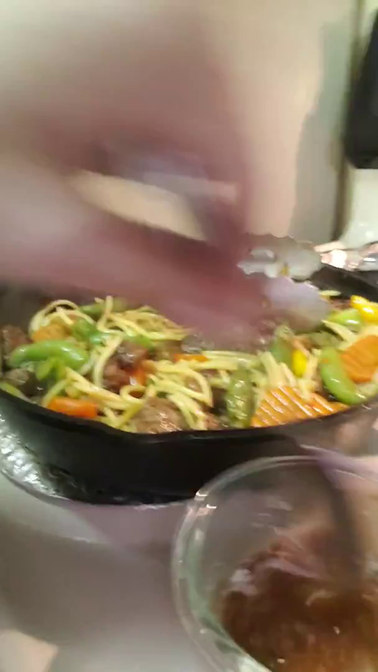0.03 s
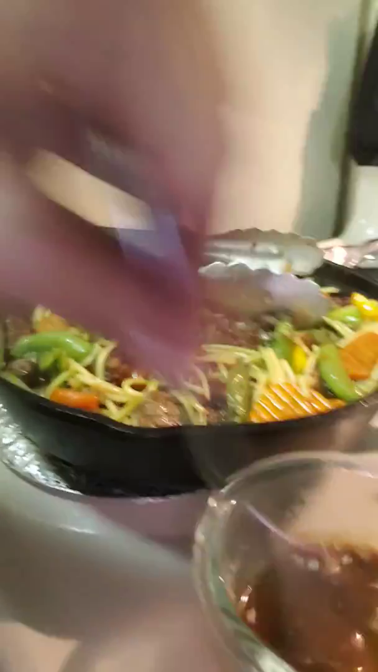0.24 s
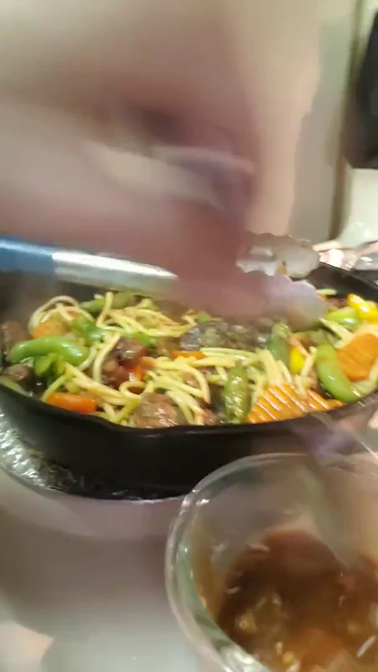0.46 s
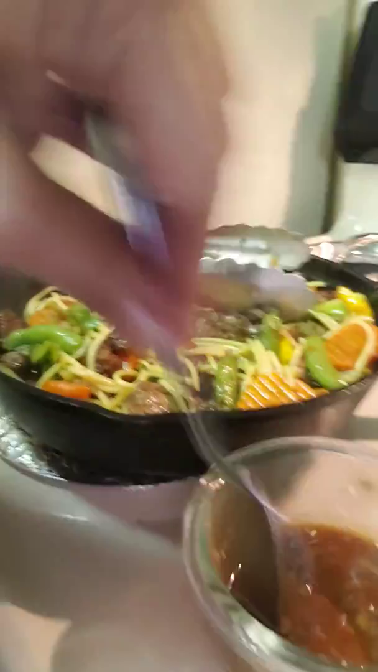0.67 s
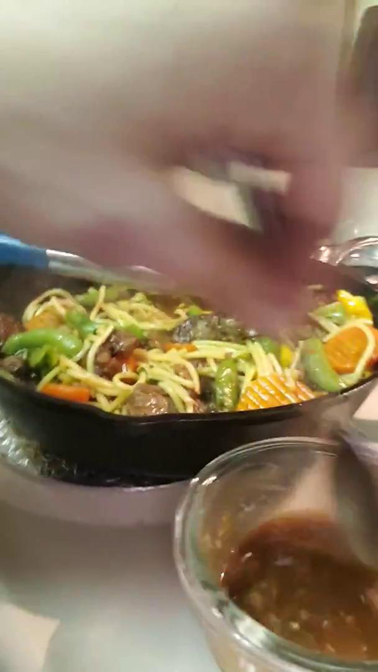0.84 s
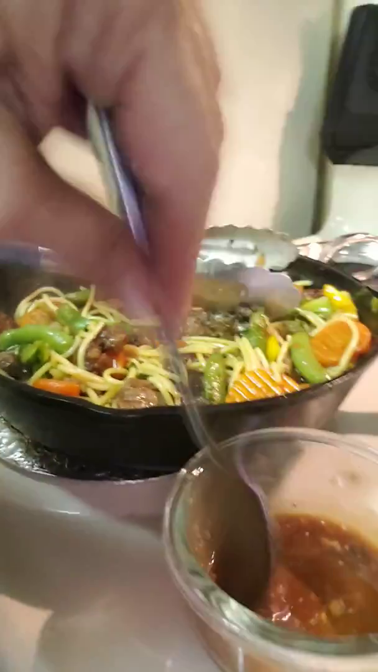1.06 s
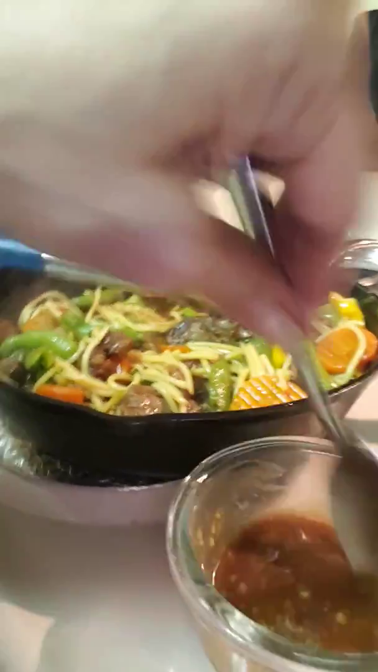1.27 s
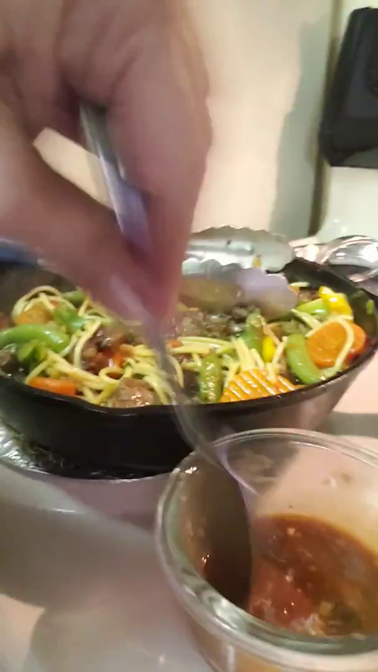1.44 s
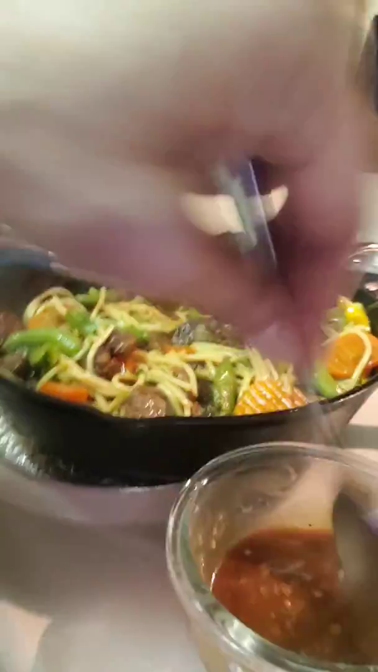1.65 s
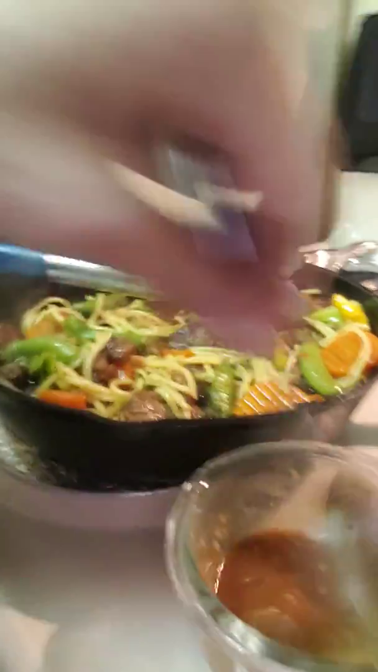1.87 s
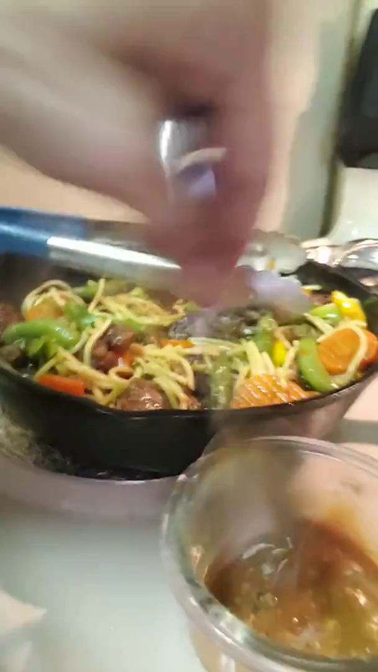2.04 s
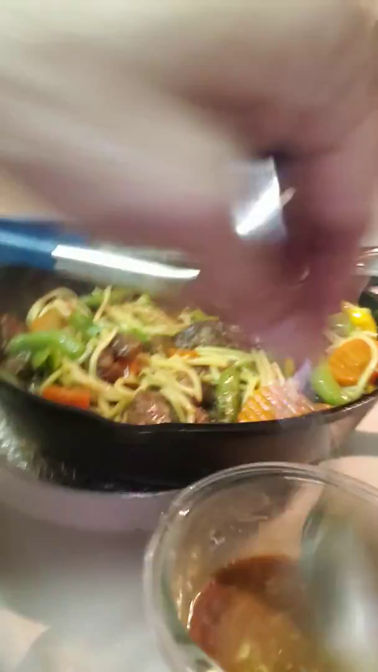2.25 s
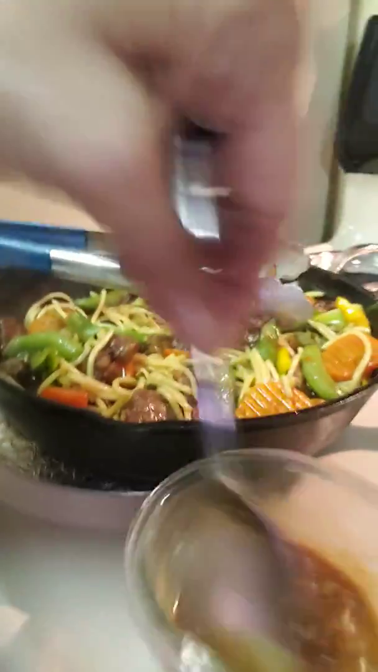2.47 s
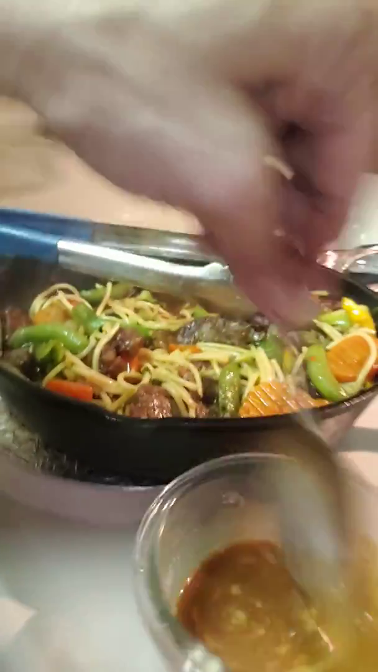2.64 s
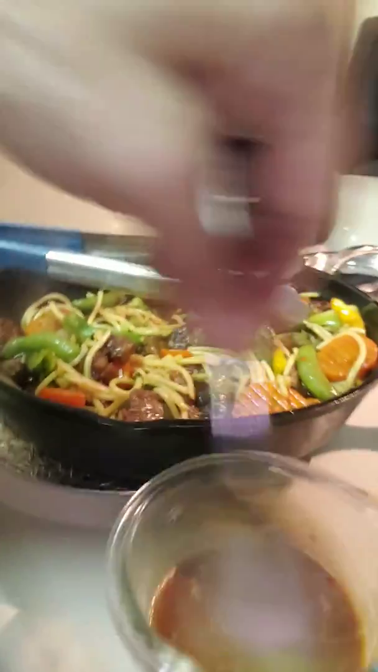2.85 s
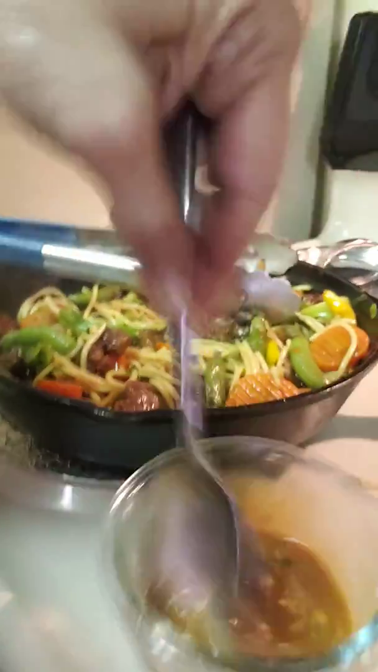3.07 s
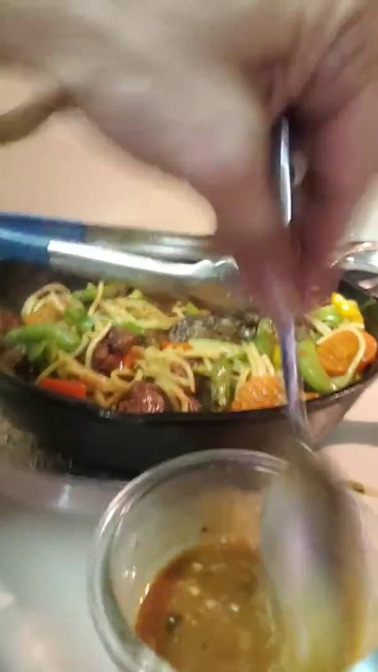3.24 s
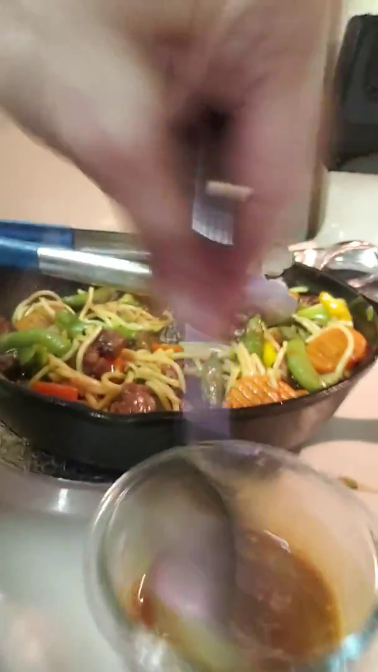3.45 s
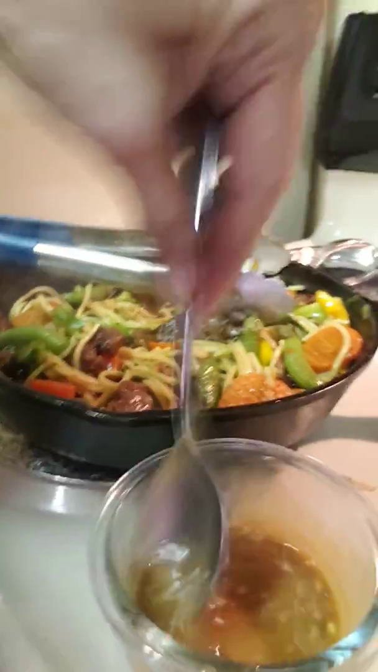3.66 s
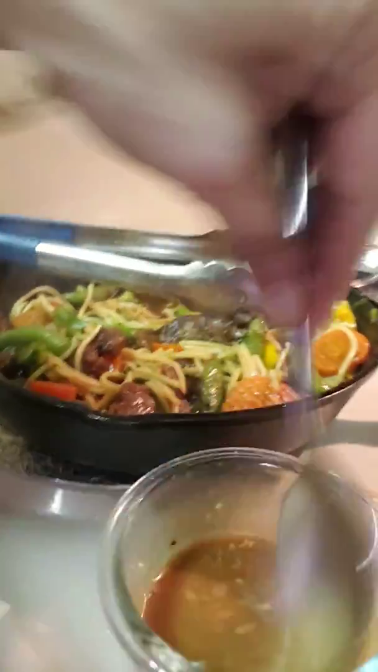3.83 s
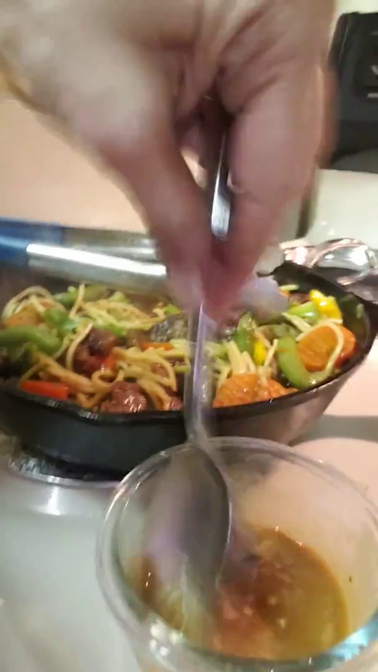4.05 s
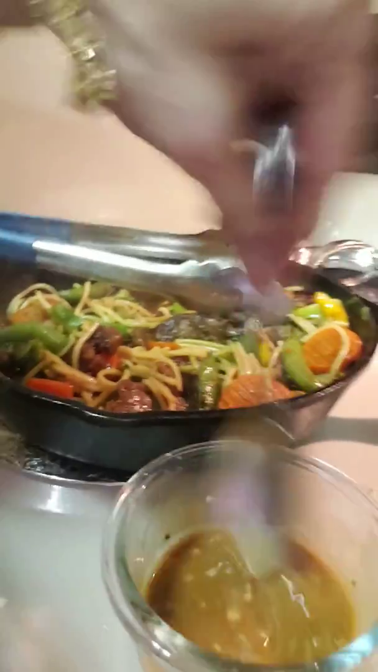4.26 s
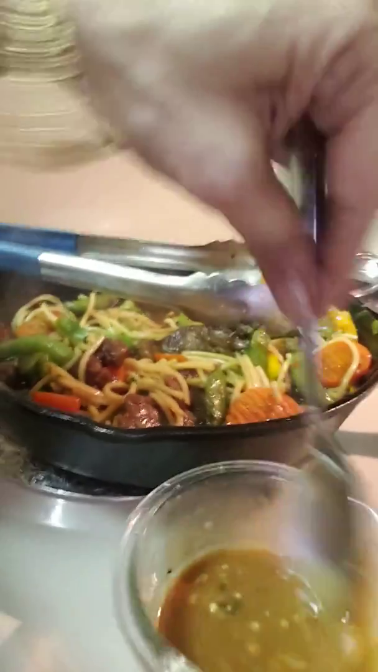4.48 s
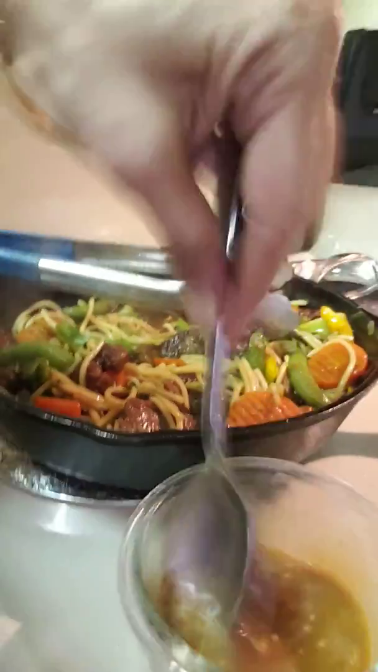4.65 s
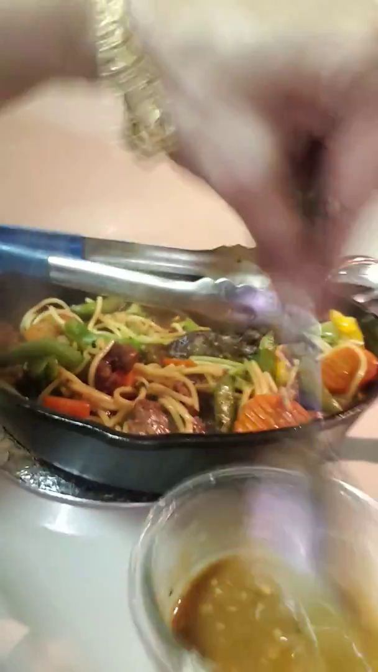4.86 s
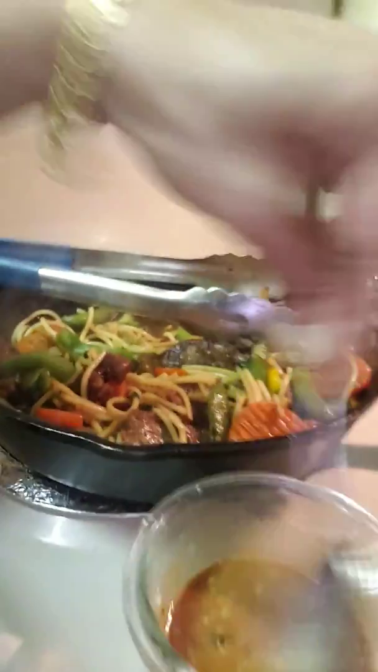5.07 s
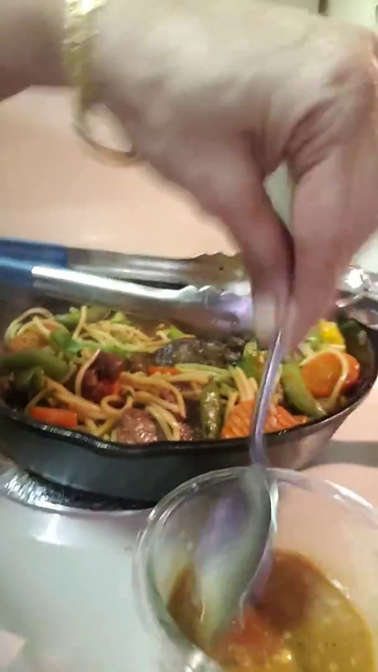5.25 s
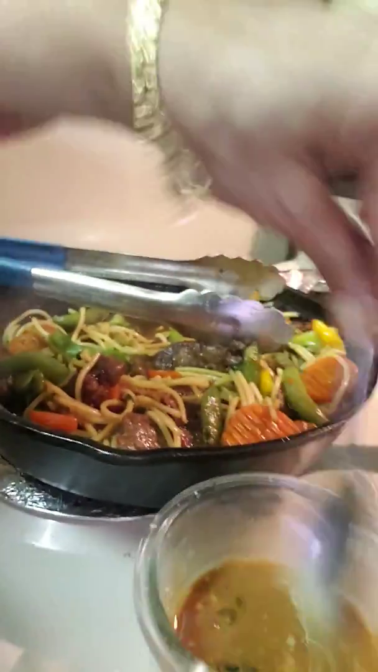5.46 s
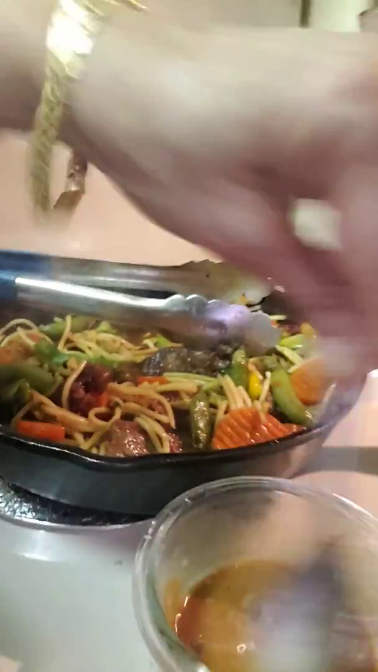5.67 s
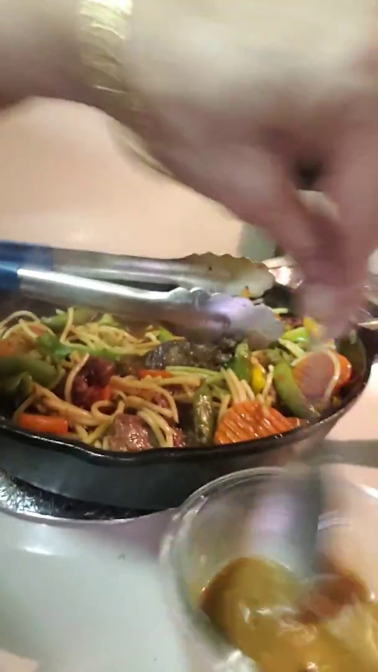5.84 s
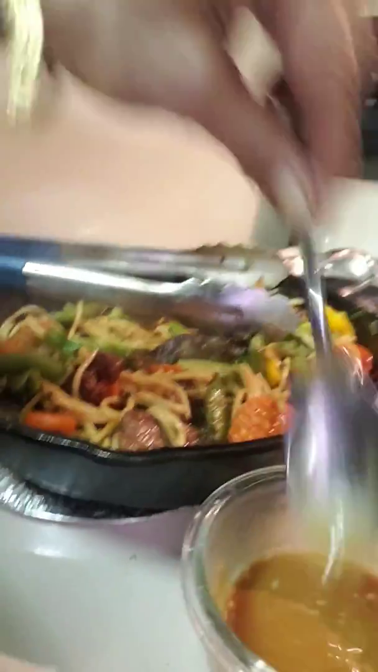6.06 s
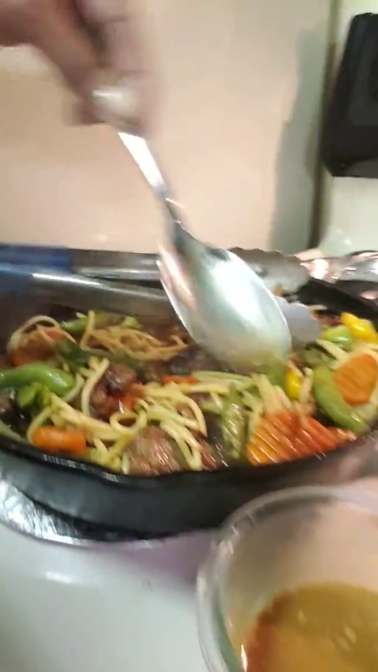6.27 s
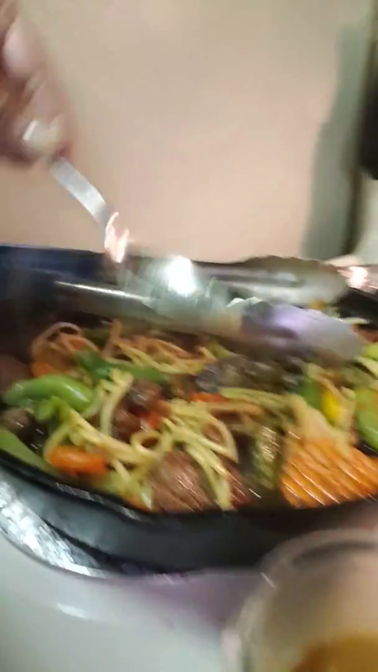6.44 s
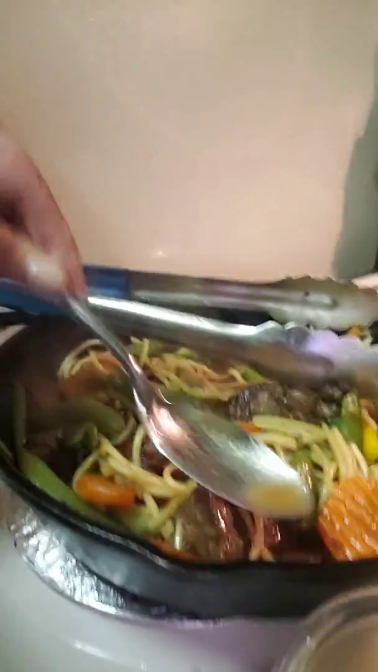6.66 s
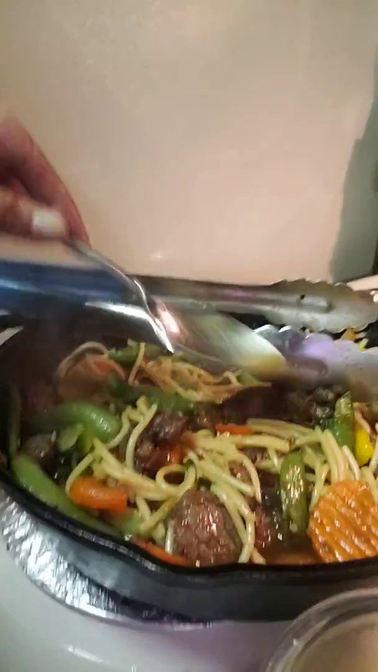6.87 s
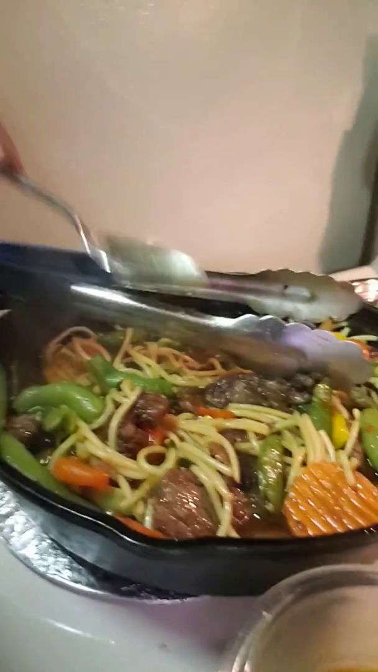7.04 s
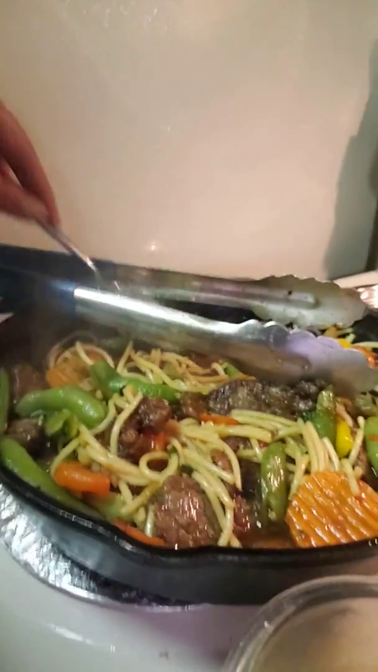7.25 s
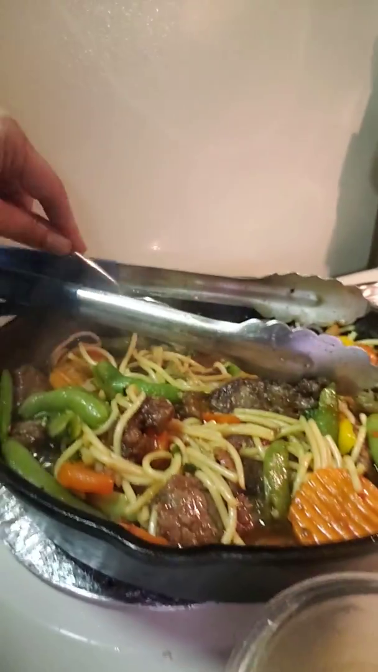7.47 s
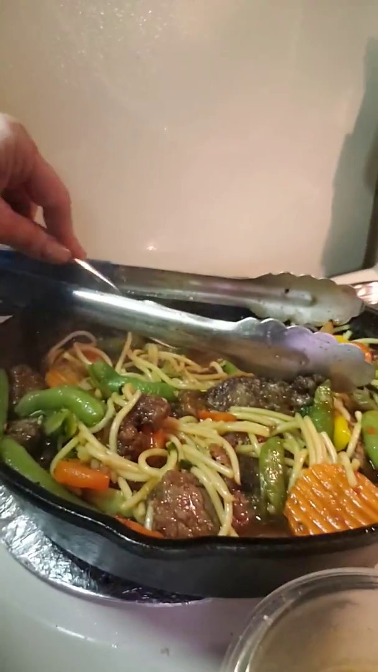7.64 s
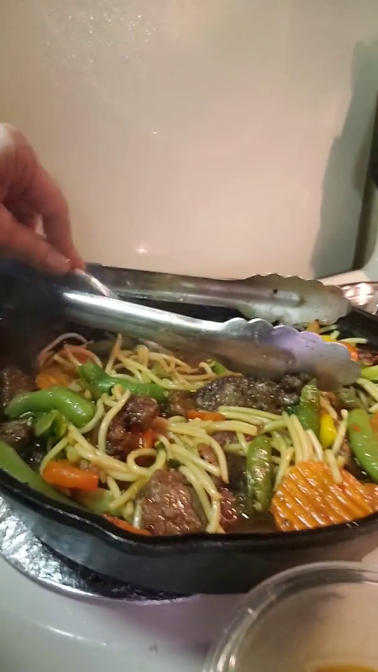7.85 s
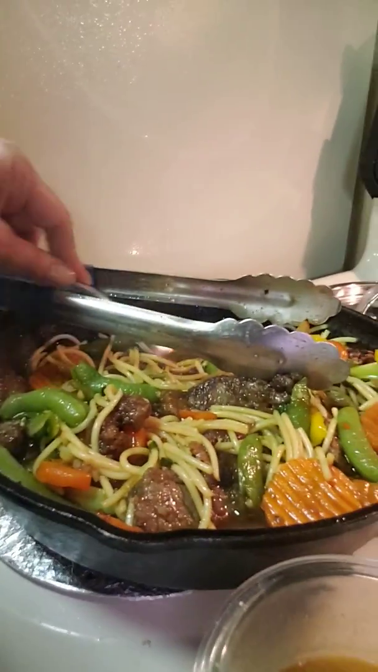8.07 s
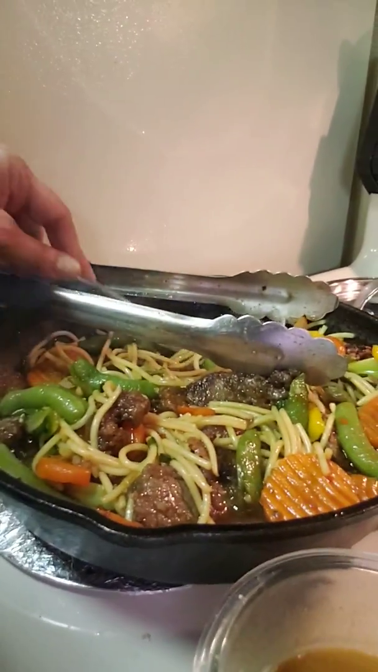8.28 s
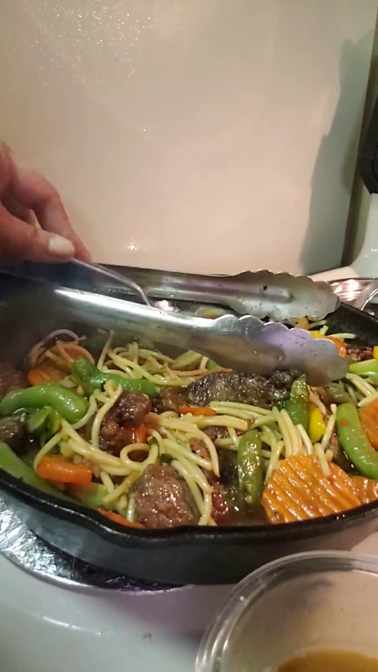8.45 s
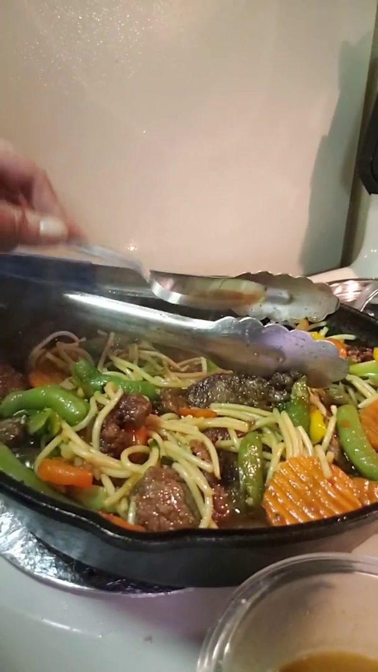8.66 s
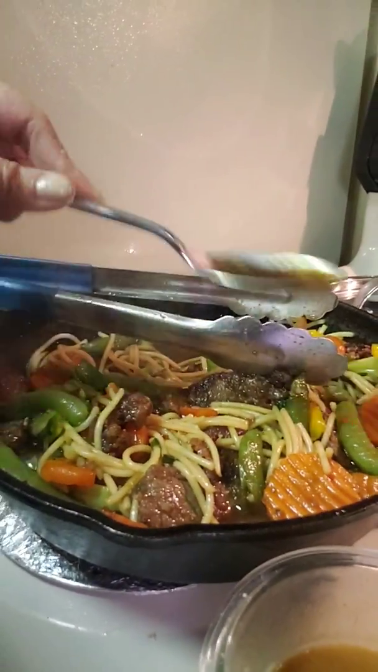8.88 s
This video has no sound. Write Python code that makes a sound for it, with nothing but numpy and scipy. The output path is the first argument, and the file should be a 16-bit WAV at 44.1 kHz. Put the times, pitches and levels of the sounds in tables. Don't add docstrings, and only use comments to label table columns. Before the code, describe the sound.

From the start to about 5.9 seconds, a metal spoon stirs sauce quickly in a small glass bowl very near the phone. Hard, bright clinks land unevenly, roughly two to five contacts a second, each a crisp crack with a short, choked high ring. Between them come lighter ticks, gritty steel-on-glass scrapes and dull bottom knocks; from about 2 seconds the knocks grow firmer, thumping the counter. Small wet splashes appear near 0.6, 2.7 and 4.5 seconds. Stirring ends near 5.9, leaving soft, fine sizzle and low kitchen motor hum. Faint spits begin around 6.4; one loud sharp pop comes at 6.9 with a brief rub, and another weaker pop at 7.3 with a short spoon slide and faint metallic notes. From 7.9 to 8.9 small crackles gather as sizzle and hum swell slightly. Short room echo throughout.

```python
import sys
import numpy as np
from scipy import signal
from scipy.fft import rfft, irfft
from scipy.io import wavfile
from scipy.ndimage import uniform_filter1d

SR = 44100
rng = np.random.default_rng(int(sys.argv[2]) if len(sys.argv) > 2 else 0)


def bounce(signal):
    frames = np.transpose(np.atleast_2d(signal))
    limited = np.clip(frames, -1, 1)
    pcm = np.round(limited * 32767).astype(np.int16)
    wavfile.write(sys.argv[1], SR, pcm)


def voltage_ratio(level):
    return 10 ** (np.asarray(level, float) / 20)


N = 392928

# (time [s], crack [dB], ring [dB], tilt to high mode [dB], free ring [ms])
BLOWS = [(0.318, -11.5, -13.5, -0.5, 14), (0.6334, -18, -22, -5, 14), (0.716, -16.5, -16.5, -9.5, 4.5),
         (1.1123, -11, -5.5, -2, 7.1), (1.4596, -17, -13.5, -6.5, 5.3), (1.711, -23.5, -24.5, 2, 5.5),
         (2.0202, -9, -11, -6.5, 4.4), (2.138, -18, -17, -4.5, 2.3), (2.366, -7, -16.5, -6, 15.6),
         (2.6609, -18, -21.5, -8, 2), (2.9763, -17, -20, -4, 3.2), (3.1101, -18, -18.5, -1, 4.4),
         (3.286, -12, -14, 2.5, 9.3), (3.6076, -10.5, -10.5, 3, 3.5), (3.6435, -18, -22.5, 0, 9.8),
         (3.665, -12.5, -21, -4.5, 14), (3.9218, -12, -11, 2.5, 6.8), (3.9305, -25.5, -17.5, -0.5, 3),
         (4.2746, -13, -13.5, 1, 6.1), (4.8752, -12.5, -11.5, 5, 14), (4.9752, -12.5, -16.5, 1.2, 7.8),
         (5.163, -10.5, -18, 4.5, 7.1), (5.5127, -12.5, -9, 4.5, 7.8), (5.8023, -13, -7.5, 2.5, 5.3)]
# (time [s], crack [dB],
# ring [dB], tilt to high mode [dB])
TOUCHES = [(-.012, -21, -16, -1.5), (.002, -34.5, -29, 5), (0.046, -36, -32, -1), (.35, -21, -25, 0),
           (2.3705, -11, -15.5, 6.5), (3.657, -20, -21.5, -1), (5.7995, -27.5, -22, 0),
           (4.58, -49, -50.5, -10), (0.0282, -36, -28, 2.5), (0.2101, -25, -32.5, -6.5),
           (0.5102, -28, -48.5, 6), (0.9687, -26, -29, -1.5), (1.1794, -33, -33.5, 5.5),
           (1.2062, -29.5, -38.5, -21.5), (1.3526, -29, -29.5, 2), (1.5665, -26, -32.5, -10.5),
           (1.9692, -34, -39, 5.5), (2.2632, -29, -32, -9.5), (2.4747, -27.5, -34, -16.5),
           (2.589, -23.5, -33, 13.5), (2.738, -31.5, -38, -17), (2.8219, -36, -39.5, -18),
           (2.9207, -28.5, -36, -16.5), (3.0368, -28, -32.5, -17), (3.3544, -21.5, -23.5, 4),
           (3.6183, -18.5, -14, 1.5), (3.973, -19.5, -22.5, -8.5), (4.356, -22.5, -38, -4),
           (4.5174, -36, -42, -7.5), (5.07, -31, -40.5, -18.5), (5.289, -22, -28.5, -6),
           (5.7516, -33, -38.5, -15), (4.295, -15, -25, -13.5), (5.164, -18.5, -10.5, 6.5),
           (5.5171, -10.5, -11.5, 8)]
# (struck [Hz], at rest [Hz], pair split [Hz], t60 [s], ring left [dB])
BOWL = [
    (2451, 3500, 33, 0.12, -21.5),
    (5875, 5890, 91, 0.24, -21),
    (10387, 10365, 30, 0.13, -17.5),
]
BOWL_LEAD_TURNS = [0.22, 0.23, 0.13]
BOWL_RISE_PER_S = [0, 0.0037, 0.0026]
BOWL_ROUGH_SHARE = [.35, 1, .5]
# (frequency [Hz], level [dB], t60 [s])
RIM_MODES = [(2870, -2, .07), (3232, -5, 0.087), (3867, 1, 0.049), (4400, -6.5, .06), (4738, -8.5, 0.084),
             (7480, -0.5, 0.057), (11650, -0.5, .07)]
# (frequency [Hz], level [dB])
CRACK_SPECTRUM = [(1500, -21.5), (3000, -13.5), (5000, -11), (7400, -3.5), (8300, -15.5), (9300, -21),
                  (11400, 1), (13200, -1.5), (15200, -3), (16500, -39.5)]
# (time [s], push as knock [dB], grip looseness as clatter re crack [dB], bowl left-right [dB])
HAND = [(0.299, -38, -14.5, -1), (.7, -35, -11.5, -1.5), (1.1, -37, -8.5, 0.5), (1.5, -33, -10, -1.7),
        (2.0, -22.5, -11.5, -2.5), (2.14, -25.5, -4.5, 0.5), (2.371, -24, -13.5, -1), (2.9, -26, -11, -1.5),
        (3.3, -25, -4.5, -1), (3.6, -26.5, -2.5, -0.5), (3.92, -29, -7, -2.5), (4.3, -29.5, -16, -1.5),
        (5.0, -31, -10.5, -0.5), (5.498, -25, -6.5, -0.5), (5.8, -29, -2.5, -2)]
# (time [s], knock [dB], clatter [dB], spoon ring [dB])
KNOCKS = [(0.803, -39, -70, -48.5), (0.367, -24.5, -27.5, -36.5), (0.51, -26, -37, -48),
          (0.858, -36, -50, -67), (.884, -33.5, -46, -65), (1.205, -25, -28, -37.5),
          (1.351, -34.5, -45, -68.5), (1.565, -26.5, -47, -44), (1.969, -31.5, -35, -57),
          (2.263, -31.5, -38, -57), (2.458, -25.5, -42, -54), (2.473, -34, -33, -50),
          (2.59, -27.5, -26.5, -68), (2.737, -24, -36.5, -35), (-.012, -35, -31, -56),
          (2.917, -35.5, -33, -65), (3.035, -22.5, -31.5, -37), (3.352, -17.5, -22, -28),
          (3.425, -30.5, -49.5, -58.5), (3.649, -22, -20, -26), (3.724, -28.5, -45, -42),
          (3.972, -25, -22.5, -32.5), (4.353, -24.5, -25, -33), (4.518, -32.5, -28.5, -52.5),
          (4.67, -36.5, -66.5, -58), (4.902, -19, -32, -32.5), (5.069, -32.5, -34, -61.5),
          (5.196, -25, -36.5, -42.5), (5.284, -25, -28.5, -47.5), (.211, -38, -53, -63),
          (5.75, -38, -41, -52), (4.507, -32.5, -35.5, -57.5), (4.579, -45, -49.5, -59),
          (5.614, -31.5, -61, -56), (5.93, -45.5, -63, -71)]
# (time [s], note [dB])
FREE_NOTES = [(.212, -38), (0.635, -21.5), (.72, -29), (2.03, -22), (2.14, -37), (2.368, -12.5),
              (2.919, -25), (3.64, -12.5), (3.951, -20), (4.277, -15), (5.071, -31.5), (5.18, -32.5),
              (5.53, -26)]
# (frequency [Hz], level [dB], t60 [s])
SPOON_MODES = [(454, 2.5, .12), (490, -4, .1), (1265, 3, 0.12), (1668, 1.5, 0.16), (1955, -3.5, .15),
               (2920, -4, .1), (3240, -4, .13)]
# (frequency [Hz], level [dB])
DRAG_SPECTRUM = [(200, -35), (450, 2), (1200, 3), (2000, -3.5), (4000, -11.5), (7000, -27.5), (8500, -37.5)]
# (frequency [Hz], level [dB])
CLATTER_SPECTRUM = [(1800, -34.5), (2500, 2), (2900, 4), (3500, -1.5), (3960, 6), (4500, -10.5), (5500, -8),
                    (7400, -6.5), (8300, -17.5)]
# (frequency [Hz], level [dB])
THUMP_SPECTRUM = [(40, -27), (70, 3), (150, -1), (350, -5), (600, -9.5), (1200, -33.5)]
# (time [s], length [s], dull rub [dB], glassy rub [dB])
SCRAPES = [(0., 0.14, -71, -44), (0.328, .13, -51.5, -34), (0.625, 0.053, -47, -39),
           (1.121, 0.046, -53.5, -37), (1.465, 0.061, -59.5, -44), (2.029, 0.072, -42, -33.5),
           (2.379, 0.13, -53.5, -33), (2.664, 0.29, -48, -52), (2.979, 0.083, -50, -43.5),
           (3.301, 0.13, -46, -47.5), (3.623, 0.12, -42.5, -29), (3.932, .12, -40, -36.5),
           (4.28, .1, -44.5, -28), (4.372, 0.083, -65, -46), (4.886, 0.13, -44.5, -31),
           (5.181, .13, -46.5, -40), (5.529, 0.17, -58, -39), (5.811, 0.16, -58, -47.5)]
# (frequency [Hz], width [Hz], level [dB])
GLASS = [(1370, 160, -21), (1668, 10, -21.5), (1952, 30, -20), (2450, 14, 3.5), (2920, 17, -15.5),
         (3265, 29, -14.5), (3885, 180, -17), (4310, 51, -18.5), (5957, 130, 0.5), (7300, 90, -19),
         (10680, 77, -8)]
# (time [s], level [dB])
THUDS = [
    (1.115, -46),
    (3.36, -39),
    (3.62, -39.5),
    (3.67, -37.5),
    (4.29, -37),
    (4.669, -45),
    (4.89, -37),
    (5.521, -42),
]
# (time [s], level [dB])
BRIGHT_TICKS = [
    (.607, -33.5),
    (.8829, -35),
    (2.3496, -34),
    (2.6853, -28),
    (2.7247, -28),
    (3.014, -38),
    (4.5082, -34.5),
    (5.9778, -48),
]
# (time [s], level [dB], left-right [dB])
SPITS = [(6.3878, -50, -6), (6.507, -41.5, -8), (6.65, -45, -8), (6.7352, -45, -5.5), (6.9087, -12, -5.5),
         (7.295, -24.5, -5), (7.554, -43.5, -4), (7.709, -40, -2), (7.7919, -47.5, -3), (7.942, -37.5, -14),
         (8.052, -30.5, -8.5), (8.0985, -31.5, -6), (8.1503, -35.5, -10), (8.287, -35.5, -13),
         (8.3472, -39, -2), (8.4236, -32.5, -8), (8.545, -38, -3), (8.596, -44, -5), (8.6774, -37, -8),
         (8.699, -36, -6), (8.7636, -43, -5), (8.855, -40.5, 5)]
# (frequency [Hz], density [dB/Hz])
SPIT_SPECTRUM = [(590, -21.5), (1000, -11.5), (2380, -21.5), (4490, -13.5), (4930, -15), (7430, -10.5),
                 (8260, -17), (12500, 0.5), (14500, -2.5), (16500, -23.5)]
# (time [s], rub [dB], length [s], note [Hz], note level [dB])
SLIDES = [
    (6.911, -46, 0.037, 1825, -58),
    (7.295, -53.5, 0.029, 1110, -72),
    (7.325, -53, 0.028, 2200, -58),
    (7.345, -49, 0.045, 1880, -56),
    (7.38, -58, 0.044, 906, -64),
    (7.412, -51, 0.05, 1865, -51),
    (7.89, -64, 0.16, 1636, -67),
]
# (frequency [Hz], level [dB])
SLIDE_SPECTRUM = [(500, -10.5), (900, -4.5), (2000, -4.5), (4500, -6), (7000, -13), (8500, -16)]
# (time [s], hum and counter rumble [dB], sizzle [dB])
BACKGROUND = [
    (0.0, -54.5, -64),
    (1.81, -56, -64.5),
    (2.36, -50, -57.5),
    (4.72, -52.5, -64),
    (5.19, -47.5, -57),
    (5.36, -55, -62),
    (7.52, -55, -63),
    (8.91, -48, -53),
]
# (frequency [Hz], density [dB/Hz])
SIZZLE_SPECTRUM = [(800, -40.5), (1300, -20), (2700, -15.5), (4500, -11.5), (6500, -10), (7600, -11.5),
                   (8600, -14), (9800, -15), (11500, -5), (13000, -3), (15600, -11), (16600, -4.5)]
# (frequency [Hz], density [dB/Hz])
HUM_SPECTRUM = [(15, -40.5), (25, -28), (40, -10.5), (60, -4), (72, -0.5), (88, -18.5), (143, -5),
                (173, -13.5), (341, -13), (371, -15), (592, -16.5), (1540, -33.5), (4000, -35.5),
                (5200, -68.5), (8800, -120)]
# (frequency [Hz], width [Hz], level [dB])
MOTOR_LINES = [(65.8, 9.7, 1.5), (145.4, 29, 1), (348, 53, -1)]
# (frequency [Hz], correlation [-1..1])
PORT_LIKENESS = [(60, 0.94), (240, 0.67), (950, 0.63), (3770, -0.19), (15000, -0.086)]
# (frequency [Hz], t60 [s])
ROOM_T60 = [(250, 0.64), (1700, 0.27), (5000, 0.33), (12000, 0.28)]
# (frequency [Hz], drop threshold under neighbours [dB])
MASKED = [(2300, 40), (3300, 17), (4600, 15), (7600, 16), (8100, 6), (9600, 7), (10000, 14), (11000, 20)]


def evened(x):
    return x / np.sqrt(np.mean(x ** 2) + 1e-20)


def read(points, hz):
    f, value = np.transpose(points)
    return np.interp(np.log(hz + 1), np.log(f + 1), value)


def follow(table, s, column):
    rows = np.transpose(table)
    return np.interp(s, rows[0], rows[column])


def add(mix, s, sound):
    at = round(s * SR)
    part, rest = mix[:, max(at, 0):], sound[:, max(-at, 0):]
    size = min(part.shape[1], rest.shape[1])
    part[:, :size] += rest[:, :size]


def colour(x, points):
    size = x.shape[-1]
    gain = voltage_ratio(read(points, np.fft.rfftfreq(size, 1 / SR)))
    return evened(irfft(rfft(x) * gain, size))


def lumps(hz_step, width_hz, depth_db):
    hz = np.arange(100, 12000, hz_step)
    width = max(round(width_hz / hz_step), 1)
    return np.transpose([hz, depth_db * evened(uniform_filter1d(rng.standard_normal(len(hz)), width))])


def wobble(count, depth_db, span):
    slow = uniform_filter1d(rng.standard_normal((2, count)), span)
    return voltage_ratio(depth_db * evened(uniform_filter1d(slow, span)))


def sides(pan_db):
    return voltage_ratio(np.array([[.5], [-.5]]) * pan_db)


def ports(lead, luck):
    return luck[0] + np.array([lead * (1 + (luck[1] - .5) / 2), 0])


def burst(t, hold_ms, t60, rise_ms):
    rise = 1 - np.exp(-t / (rise_ms / 1000))
    return rise * voltage_ratio(-60 * np.maximum(t - hold_ms / 1000, 0) / t60)


def ring(t, hz, phases):
    return np.sin(2 * np.pi * (hz * t + phases[:, None]))


def modes(t, table, luck, spread, scatter_db):
    out = 0
    for (hz, db, t60), u in zip(table, luck):
        tone = ring(t, hz * (1 + spread * (u[2] - .5)), ports(hz / 5000, u))
        out = out + voltage_ratio(db - scatter_db * u[3]) * tone * burst(t, 0, t60, 0.066)
    return out


def wall_contacts():
    rows = BLOWS + [(*row, max(13.5 + 0.4 * (row[2] + 10), 2)) for row in TOUCHES]
    outer_db = -7
    return [(s, crack_db, ring_db + outer_db - tilt_db, ring_db, ring_db + outer_db + tilt_db, free_ms)
            for s, crack_db, ring_db, tilt_db, free_ms in rows]


def clinks():
    out, t = np.zeros((2, N)), np.arange(12288) / SR
    brief = t[:4096]
    contacts = wall_contacts()
    for (s, crack_db, *ring_db, free_ms), luck in zip(contacts, rng.random((len(contacts), 3, 8))):
        at = s + .0006
        noise = colour(colour(rng.standard_normal((2, 4096)), lumps(50, 300, 3)), CRACK_SPECTRUM)
        tick = burst(brief, 0.08, 0.0071, 0.027)
        crack = voltage_ratio(-7.5) * burst(brief, 0.15 * free_ms, 0.079, 0.032)
        add(out, at, voltage_ratio(crack_db - 3.0) * noise * (tick + crack))
        rim = modes(brief, RIM_MODES, rng.random((len(RIM_MODES), 4)), spread=0.022, scatter_db=18.5)
        add(out, at, voltage_ratio(crack_db - 11) * rim * wobble(4096, depth_db=4, span=80))
        rough = wobble(len(t), depth_db=5, span=60)
        for mode, lead, share, rise, db, u in zip(BOWL, BOWL_LEAD_TURNS, BOWL_ROUGH_SHARE,
                                                  BOWL_RISE_PER_S, ring_db, luck):
            struck_hz, rest_hz, split_hz, t60, left_db = mode
            struck = ring(t, struck_hz * (.988 + rise * s + 0.0089 * u[6]), ports(lead, u))
            twin_hz = struck_hz + 1.2 * split_hz * np.sign(u[4] - .3)
            struck = struck + .6 * u[5] * ring(t, twin_hz, u[2:4])
            rest = ring(t, rest_hz - split_hz * u[7] / 2, u[2:4])
            rest = rest + 0.39 * ring(t, rest_hz + split_hz * u[6], u[4:6])
            rest = rest + 0.31 * ring(t, rest_hz - split_hz * (1 + u[5]), u[1:3])
            free = struck * burst(t, free_ms, 0.032, 0.11)
            choked = voltage_ratio(left_db) * rough ** share * rest * burst(t, 0, t60, 4.0)
            add(out, at, voltage_ratio(db - 1.5) * (free + choked))
    return out * sides(-3.3)


def bottom_contacts():
    s, crack_db, _, _, free_ms = np.transpose(BLOWS)
    push_db = follow(HAND, s, column=1)
    clatter_db = crack_db + follow(HAND, s, column=2)
    blows = np.transpose([s, push_db, clatter_db, push_db - 15.5, 1.2 * free_ms, (push_db + clatter_db) / 2])
    blows = blows[np.diff(s, prepend=0) > .05]
    drag_ms = 4.5
    bottom = [(*row, drag_ms, (row[1] + row[2]) / 2 - 5.5) for row in KNOCKS]
    notes = [(at, *[-np.inf] * 3, drag_ms, db) for at, db in FREE_NOTES]
    return list(blows) + bottom + notes


def knocks():
    out, t = np.zeros((2, N)), np.arange(12288) / SR
    note_hz, note_t60 = 2382, 0.15
    luck_size = (len(BLOWS + KNOCKS + FREE_NOTES), 8, 4)
    for (s, db, clatter_db, spoon_db, drag_ms, note_db), luck in zip(bottom_contacts(), rng.random(luck_size)):
        noise = rng.standard_normal((4, len(t)))
        slips = voltage_ratio(3.2 * evened(uniform_filter1d(noise[2], 60)))
        thump = colour(noise[3], THUMP_SPECTRUM) * burst(t, 1.5 * drag_ms, 0.31, 4.4)
        body = colour((noise[:2] + 1.1 * noise[0]) * slips, lumps(25, 75, 3.5))
        drag = colour(body, DRAG_SPECTRUM) * burst(t, drag_ms, 0.084, .8)
        rattle = burst(t, .5 * drag_ms, 0.053, 0.31) + voltage_ratio(-19.5) * burst(t, drag_ms, 0.15, 3.5)
        clatter = colour(body, CLATTER_SPECTRUM) * rattle
        spoon = modes(t, SPOON_MODES, luck[1:], spread=0.0022, scatter_db=7)
        spoon = spoon * wobble(len(t), depth_db=4, span=150)
        phases = luck[0, :1] + 0.63 * luck[0, 1:3]
        note = ring(t, note_hz * (.999 + 0.0027 * luck[0, 2]), phases) * burst(t, 27, note_t60, 4.9)
        note = note * wobble(len(t), depth_db=2, span=300)
        add(out, s, (voltage_ratio(db - 8.0) * drag + voltage_ratio(spoon_db - 2.5) * spoon) * sides(-9))
        glass = (voltage_ratio(clatter_db - 5.0) * clatter + voltage_ratio(note_db - 10.0) * note) * sides(-4.5)
        add(out, s, glass + voltage_ratio(db - 12.5) * thump)
    return out


def scrapes():
    out, t, hz = np.zeros((2, N)), np.arange(12288) / SR, np.arange(500, 13000, 10)
    peaks = sum(voltage_ratio(db) / (1 + (2 * (hz - f) / width) ** 2) for f, width, db in GLASS)
    peaks = peaks + voltage_ratio(-23.5) * (abs(hz - 9000) > 1100) + voltage_ratio(-45)
    glass_spectrum = [(300, -90), *zip(hz, 20 * np.log10(peaks)), (14000, -90)]
    for s, length, rub_db, glass_db in SCRAPES:
        noise = rng.standard_normal((3, len(t)))
        slips = (noise[:2] + .8 * noise[0]) * voltage_ratio(2.5 * evened(uniform_filter1d(noise[2], 100)))
        slips = colour(slips, lumps(10, 30, 2.5))
        dull = voltage_ratio(rub_db - 3.0) * colour(slips, DRAG_SPECTRUM) * sides(-4.5)
        glassy = voltage_ratio(glass_db - 0.5) * colour(slips, glass_spectrum) * sides(-6.5)
        add(out, s, (dull + glassy) * burst(t, 300 * length, 2.5 * length, 4.4))
    return out


def thuds():
    out, t = np.zeros((2, N)), np.arange(12288) / SR
    hz = 64.45 * (1 + 0.14 * np.exp(-t / .03))
    for s, db in THUDS:
        shudder = ring(t, hz, np.full(2, rng.random()))
        add(out, s, voltage_ratio(db) * shudder * burst(t, 30, 0.43, 9.1))
    return out


def spatter(events, t60):
    out, t = np.zeros((2, N)), np.arange(8192) / SR
    for s, db, pan_db in events:
        noise = colour(colour(rng.standard_normal((2, len(t))), lumps(64, 200, 0.9)), SPIT_SPECTRUM)
        add(out, s, voltage_ratio(db - 11) * noise * burst(t, 2.0, t60, 0.24) * sides(pan_db))
    return out


def bright_ticks():
    return spatter([(*row, -3) for row in BRIGHT_TICKS], t60=0.039)


def spits():
    return spatter(SPITS, t60=0.081)


def slides():
    out, t = np.zeros((2, N)), np.arange(8192) / SR
    for s, db, length, hz, note_db in SLIDES:
        rub = colour(colour(rng.standard_normal((2, len(t))), lumps(25, 150, 4)), SLIDE_SPECTRUM)
        swell = np.sin(np.pi * np.clip(t / length, 0, 1) ** .6)
        rub = rub * wobble(len(t), depth_db=4, span=50) * swell
        note = ring(t, hz, rng.random(2)) * burst(t, 22.8, 0.15, 5.7)
        note = note * wobble(len(t), depth_db=2.9, span=150)
        add(out, s, (voltage_ratio(db) * rub + voltage_ratio(note_db) * note) * sides(-4.5))
    return out


def crackle():
    t, pops_per_s, re_sizzle_db = np.arange(512) / SR, 60, 1
    pops = (rng.random(N) < pops_per_s / SR) * voltage_ratio(4.76 * np.minimum(rng.exponential(1, N), 4))
    pops = pops * voltage_ratio(follow(BACKGROUND, np.arange(N) / SR, column=2) + re_sizzle_db)
    kind = rng.integers(0, 8, N)
    grains = colour(rng.standard_normal((8, 2, 512)), SPIT_SPECTRUM) * burst(t, .5, 0.0095, 0.21)
    out = np.zeros((2, N))
    for k, grain in enumerate(grains):
        out += signal.oaconvolve((pops * (kind == k))[None], grain, axes=1)[:, :N]
    return out * sides(-3)


def field(spectrum_db, column, size, patchy_db, flicker_db):
    hop = size // 4
    frames, hz = N // hop + 5, np.fft.rfftfreq(size, 1 / SR)
    a, b, c, d, patches = rng.standard_normal((frames, len(hz), 5)).T
    patches = evened(uniform_filter1d(uniform_filter1d(patches, 8, 0), 8, 1))
    flicker = evened(uniform_filter1d(rng.standard_normal(frames), 4))
    same = np.clip(read(PORT_LIKENESS, hz), -1, 1)[:, None]
    left = a + 1j * b
    right = same * left + np.sqrt(1 - same ** 2) * (c + 1j * d)
    z = np.array([left, right])
    z *= voltage_ratio(spectrum_db(hz)[:, None] + patchy_db * patches + flicker_db * flicker)
    noise = evened(signal.istft(z, nperseg=size, noverlap=size - hop)[1][:, :N])
    return voltage_ratio(follow(BACKGROUND, np.arange(N) / SR, column)) * noise


def sizzle():
    noise = field(lambda hz: read(SIZZLE_SPECTRUM, hz), column=2, size=256, patchy_db=2, flicker_db=1.4)
    return noise * voltage_ratio(2.5) * sides(-2.5)


def hum_db(hz):
    lines = sum(voltage_ratio(db) ** 2 * 4 / (1 + (2 * (hz - f) / width) ** 2) for f, width, db in MOTOR_LINES)
    return read(HUM_SPECTRUM, hz) + 10 * np.log10(1 + lines)


def hum():
    return field(hum_db, column=1, size=4096, patchy_db=2.5, flicker_db=1.5) * voltage_ratio(1.5)


def kitchen(x):
    taps = np.zeros((2, SR // 2))
    at = np.arange(200, SR // 2 - 20, 20) + rng.integers(0, 20, (2, (SR // 2 - 201) // 20))
    np.put_along_axis(taps, at, rng.choice([-1., 1.], at.shape), 1)
    hz, t, z = signal.stft(taps, SR, nperseg=256)
    tail = signal.istft(z * voltage_ratio(-60 * t / read(ROOM_T60, hz)[:, None]), SR, nperseg=256)[1]
    x = signal.sosfilt(signal.butter(2, 500, "high", fs=SR, output="sos"), x)
    return signal.fftconvolve(x, tail / np.linalg.norm(tail[0]), axes=1)[:, :N]


def scene():
    bowl = clinks() + knocks() + scrapes()
    bowl = bowl * sides(follow(HAND, np.arange(N) / SR, column=3))
    hits = bowl + bright_ticks() + spits() + slides() + thuds()
    return hits + voltage_ratio(-11.5) * kitchen(hits) + crackle() + sizzle() + hum()


def thin_treble(x, edge_hz, attack_db, thrift_db):
    hz, _, z = signal.stft(x, SR, nperseg=1024, noverlap=768)
    power = (abs(z[:, :512]) ** 2).mean(0)
    bands = uniform_filter1d(power, size=3, axis=1).reshape(64, 8, -1).mean(1) + 1e-16
    masker = uniform_filter1d(bands, size=17, axis=0)
    count = bands.shape[1]
    thrift = np.repeat(rng.exponential(1, (count // 6 + 1, 64)).T, 6, axis=1)[:, :count]
    under_db = np.maximum(read(MASKED, hz[4:512:8])[:, None] - thrift_db * thrift, .5)
    keep = np.repeat(bands > masker * voltage_ratio(-2 * under_db), 8, axis=0)
    total_db = 10 * np.log10(power[200:].sum(0) + 1e-16)
    attack = total_db - np.roll(total_db, 1) > attack_db
    z[:, :512] *= np.where(hz[:512, None] > edge_hz, attack, keep | attack)
    z[:, hz > 16700] = 0
    return signal.istft(z, SR, nperseg=1024, noverlap=768)[1][:, :N]


def low_pass(x):
    return signal.sosfilt(signal.butter(12, 16760, fs=SR, output="sos"), x)


def record(dry):
    ceiling = 1.3
    limited = ceiling * np.tanh(dry / ceiling)
    mix = thin_treble(limited, edge_hz=15600, attack_db=6, thrift_db=4)
    return low_pass(np.clip(mix, -1, 1))


dry = scene()
out = record(dry)
bounce(out)
```